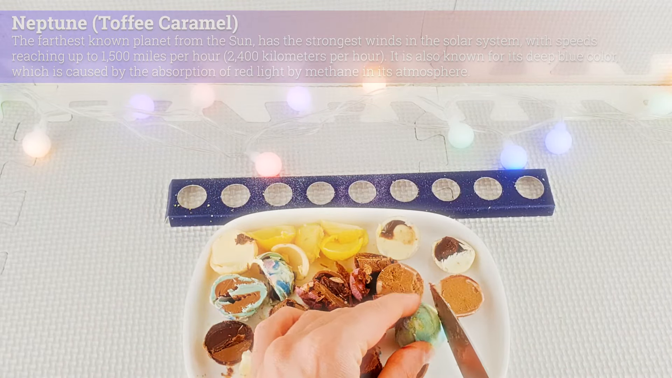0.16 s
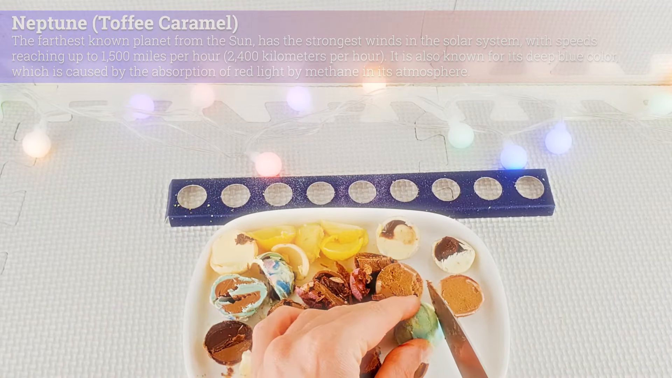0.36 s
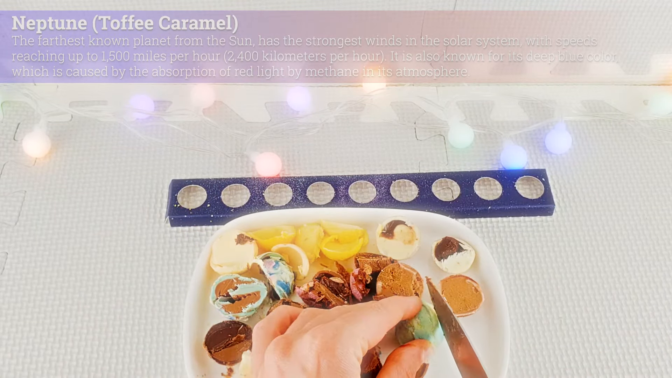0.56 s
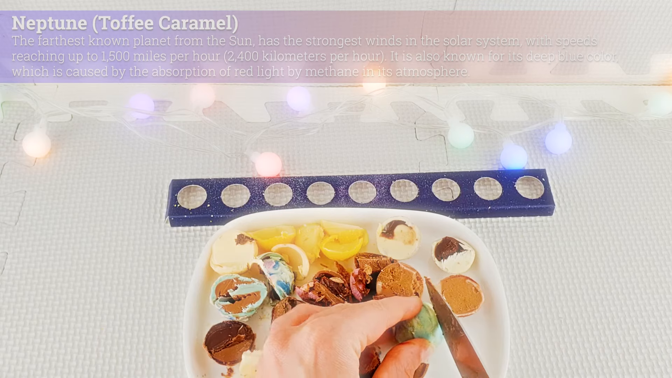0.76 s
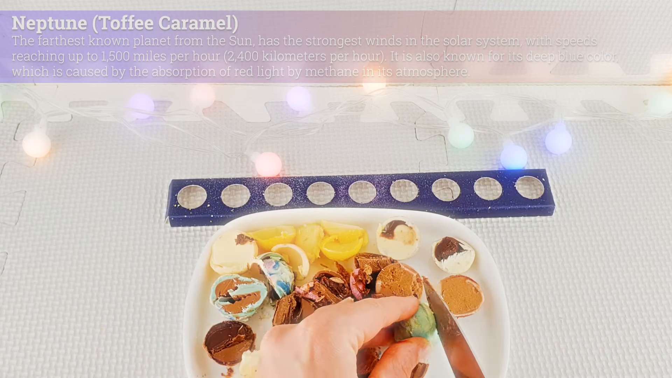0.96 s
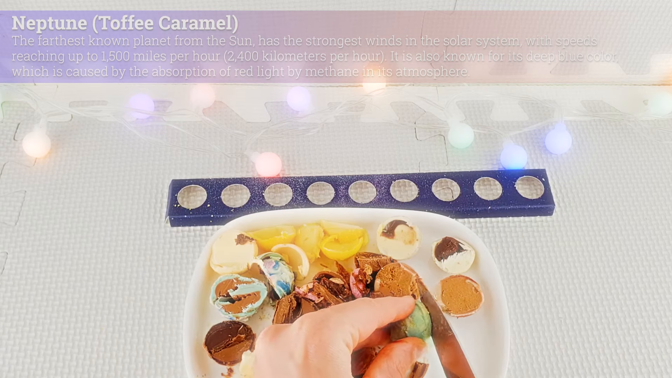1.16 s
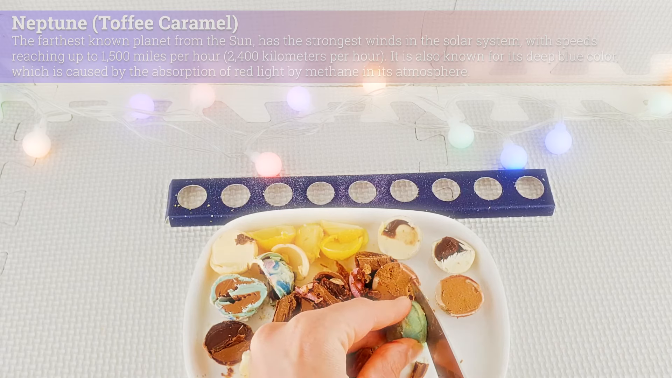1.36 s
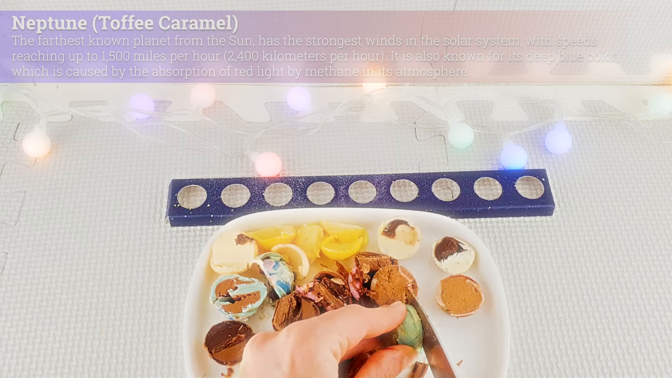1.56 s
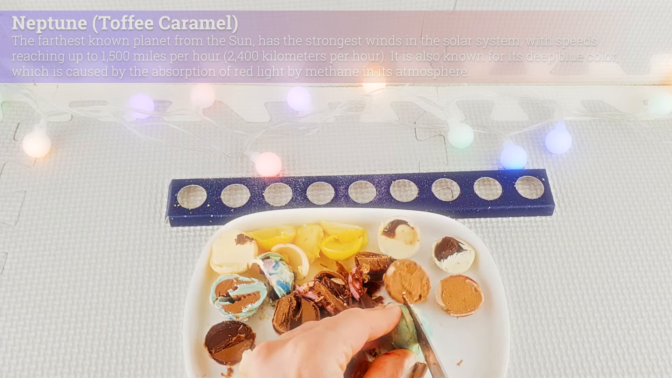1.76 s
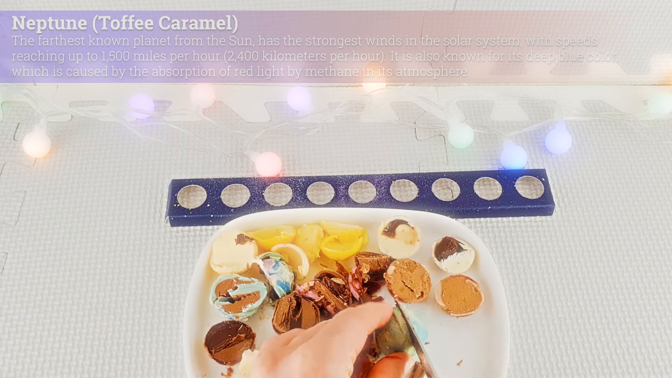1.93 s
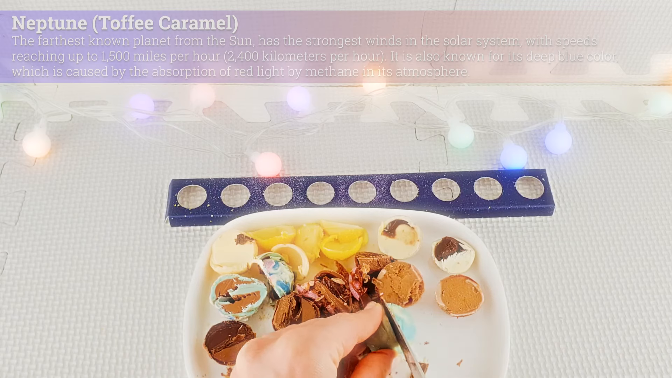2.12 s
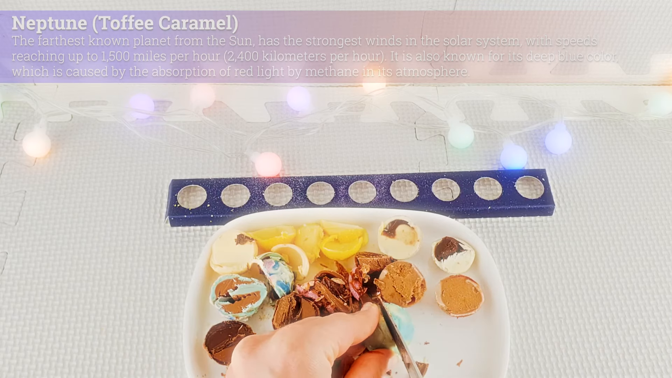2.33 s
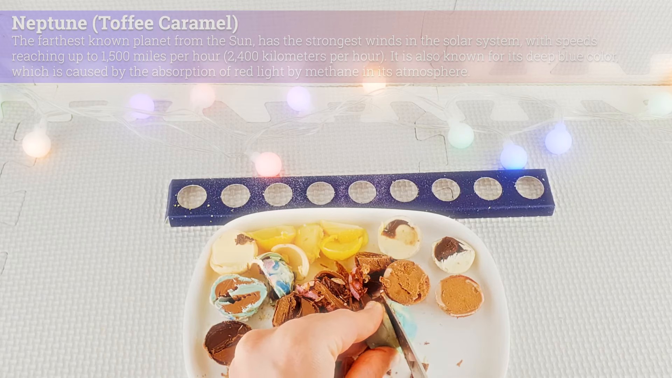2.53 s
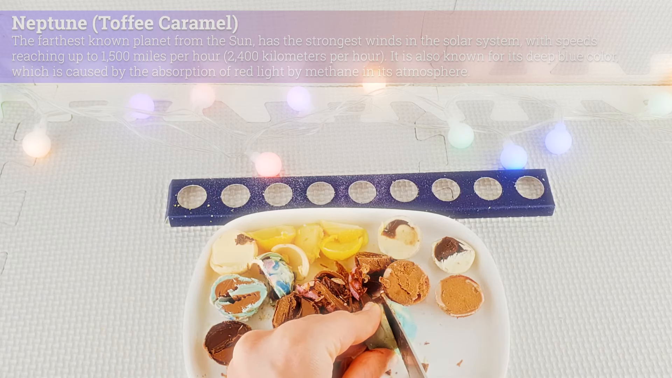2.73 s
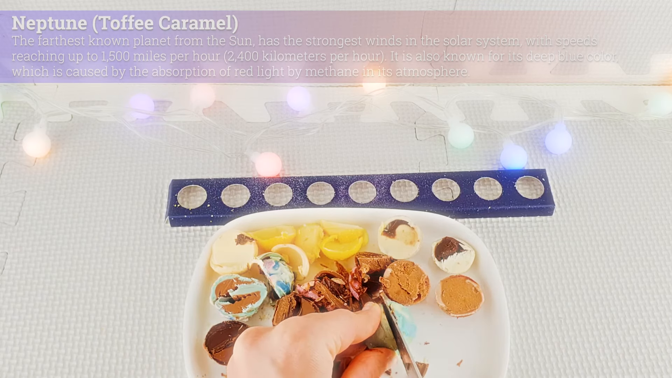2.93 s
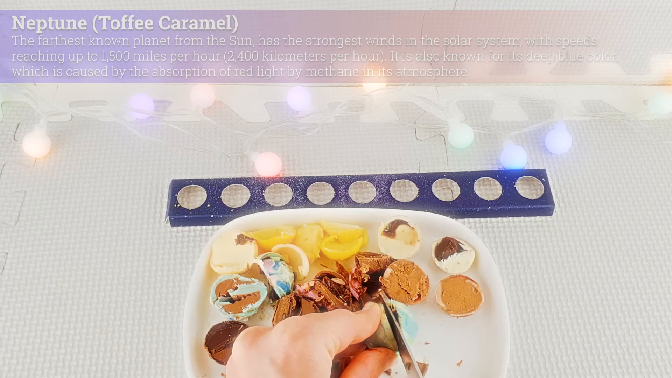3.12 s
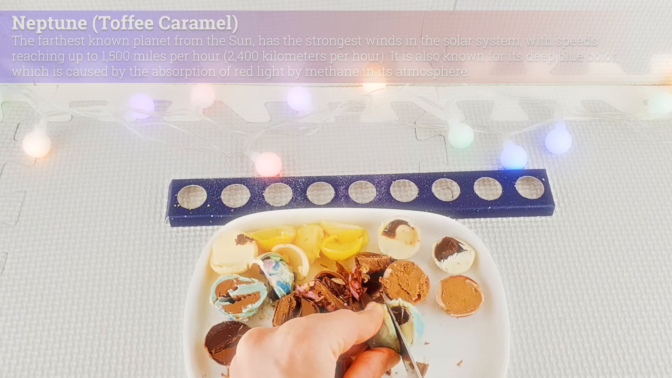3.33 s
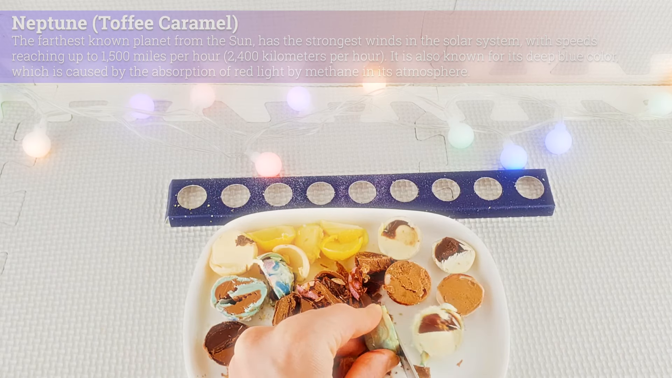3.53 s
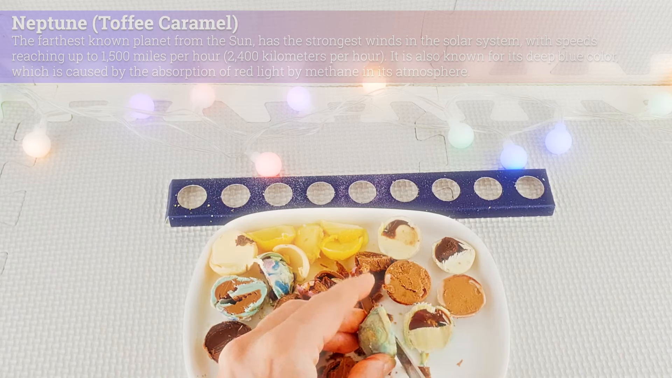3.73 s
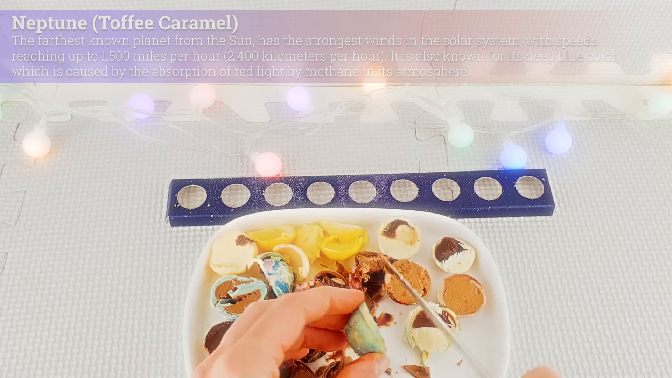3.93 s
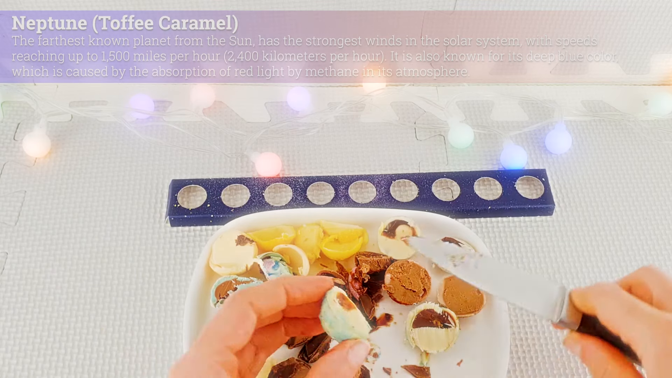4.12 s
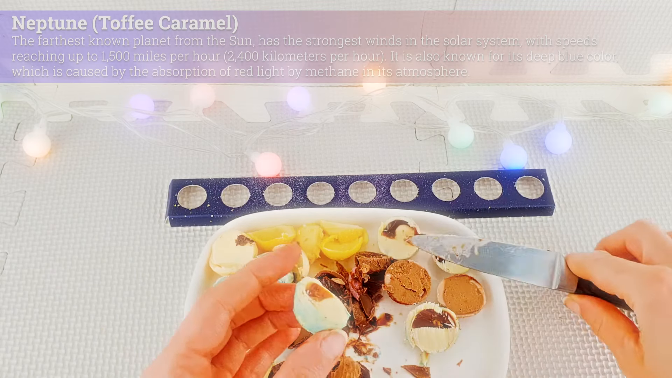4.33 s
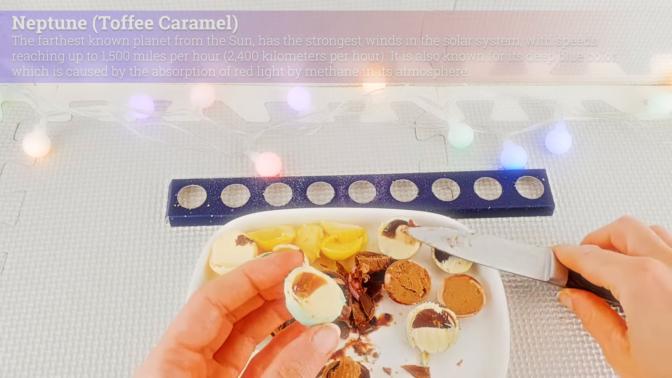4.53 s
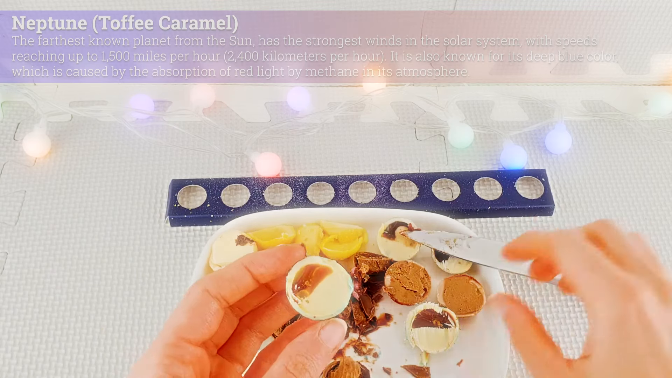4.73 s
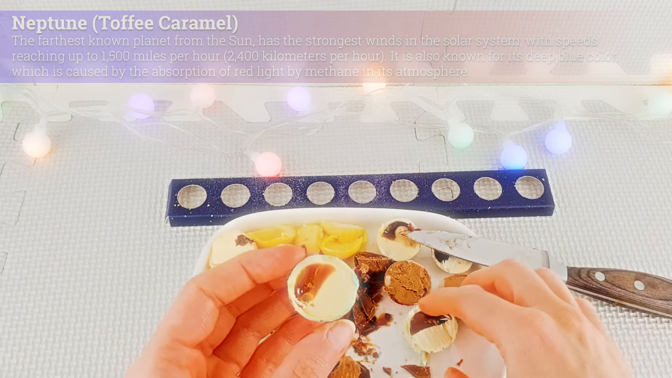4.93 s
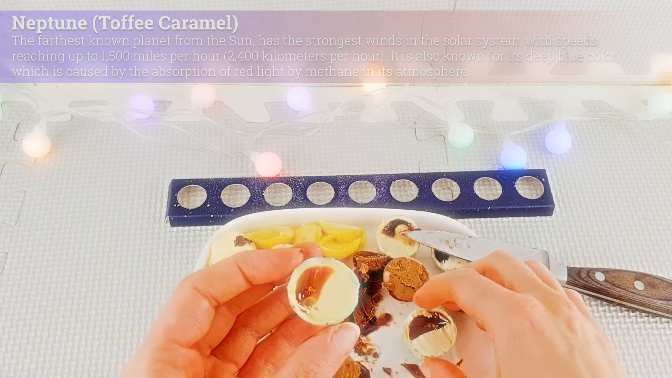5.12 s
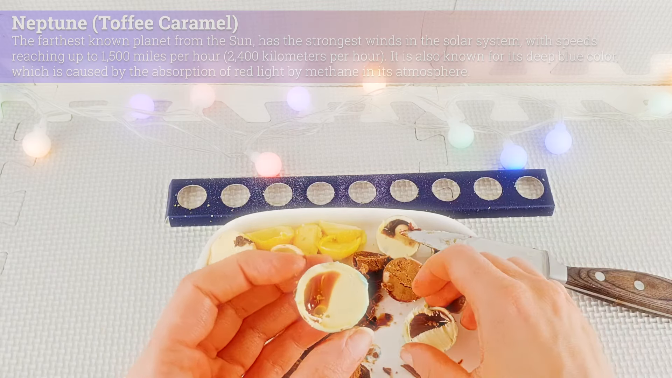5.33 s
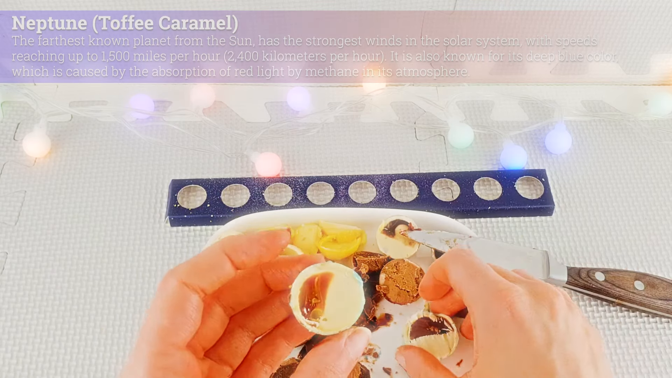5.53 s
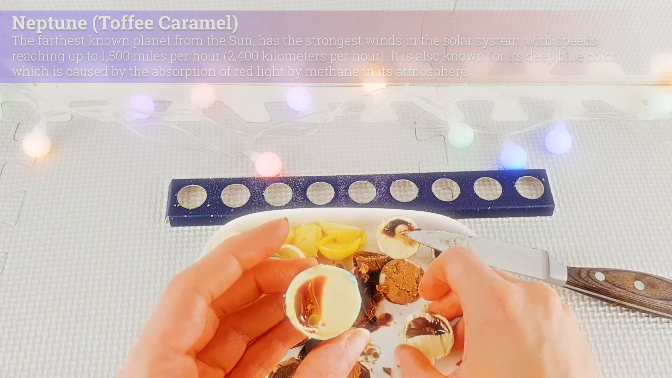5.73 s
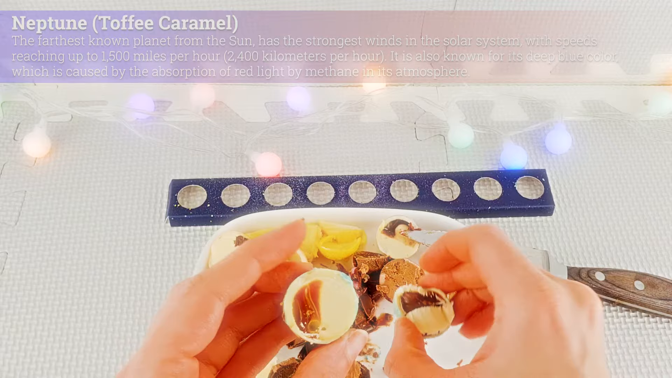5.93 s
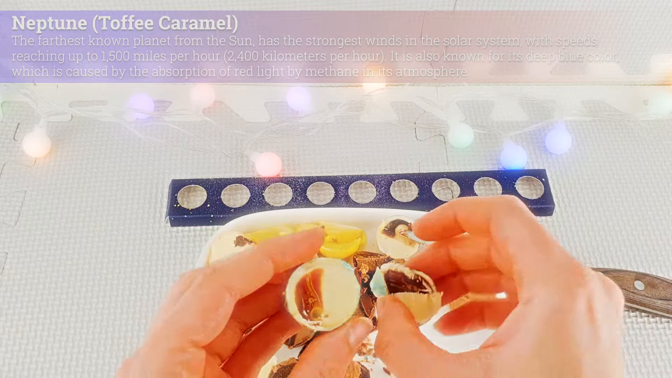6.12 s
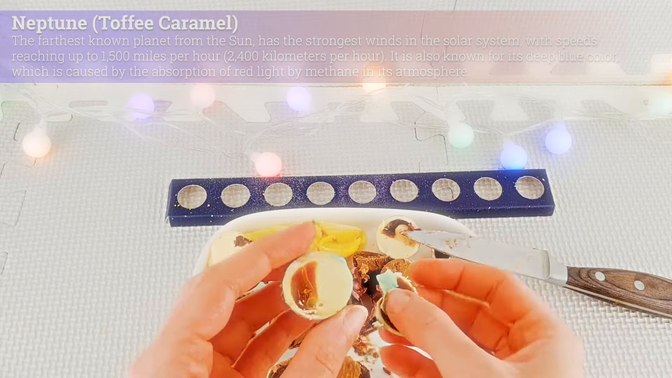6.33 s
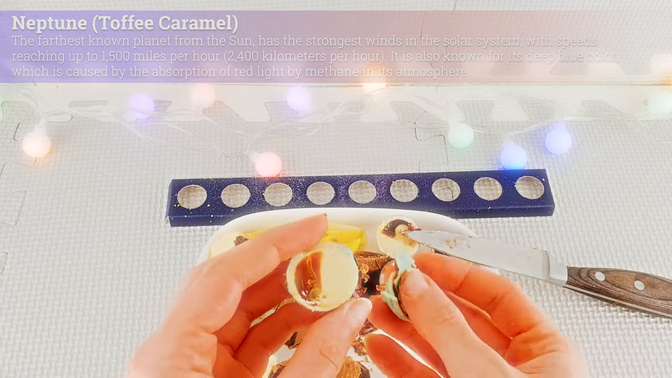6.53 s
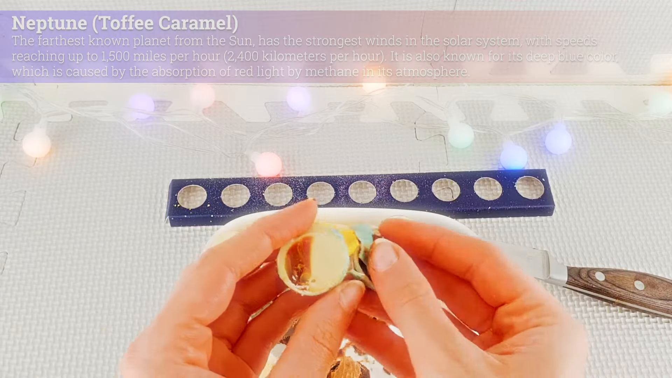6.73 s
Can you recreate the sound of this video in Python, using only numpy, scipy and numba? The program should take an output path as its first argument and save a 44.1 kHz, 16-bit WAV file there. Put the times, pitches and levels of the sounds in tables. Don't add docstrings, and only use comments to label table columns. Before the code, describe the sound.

Close, quiet cutting rumbles through a table, a sharp overloaded crack strikes a plate, then knife clicks, small taps and a brief crumb crunch follow.

```python
import sys
import numpy as np
from scipy import signal
from scipy.fft import rfft, irfft, next_fast_len
from scipy.io import wavfile
from scipy.ndimage import uniform_filter1d
from numba import njit

SR = 44100
rng = np.random.default_rng(int(sys.argv[2]) if len(sys.argv) > 2 else 0)


def invert_db(level):
    return 10 ** (np.asarray(level, dtype=float) / 20)


def persist_wave(psi):
    counts = np.round(np.clip(psi, -1, 1) * 32767).astype(np.int16)
    wavfile.write(sys.argv[1], SR, np.atleast_2d(counts).T)


N = 302922

# (frequency [Hz], density [dB per Hz])
HISS_COLOUR = [(150, -30), (260, 3), (427, -12), (499, -4), (1350, -9.5), (3710, -11.5), (7620, -24.5),
               (9360, -21), (10200, -27.5), (15600, -31)]
HISS_DB, CRACK_S = -84.5, 3.36
GATE_DB, GATE_SLOPE = -36.5, .75

# (time [s], level [dB])
WORK = [(0, -62), (0.351, -62), (0.9, -59), (1.37, -66.5), (1.65, -57.5), (2.1, -62), (2.44, -63),
        (2.798, -61), (3.2, -59), (3.78, -60), (4.04, -72.5), (4.84, -71.5), (5.0, -68), (5.5, -67.5),
        (5.75, -59), (6.0, -70), (6.34, -63), (6.87, -65.5)]
# (time [s], tremble [dB], rub [dB], spread [ms])
MOVES = [(0.049, -71.5, -74, 67), (.44, -57.5, -82, 50), (.962, -56.5, -101, 84), (1.144, -67, -101, 47),
         (1.25, -66, -84, 95), (1.466, -64, -89, 58), (1.719, -61, -75.5, 69), (1.82, -68, -86, 24),
         (1.91, -70, -80, 57), (2.01, -57.5, -77.5, 43), (2.214, -55, -99, 66), (2.501, -58, -76.5, 120),
         (2.686, -64, -86, 77), (2.769, -70, -80, 27), (2.95, -57, -76.5, 93.2), (3.097, -70, -101, 58),
         (3.28, -52.5, -101, 46), (4.075, -68, -108, 67), (4.168, -87.5, -100, 46), (4.278, -69, -106, 20),
         (4.95, -62.5, -100.5, 61), (5.14, -72, -96, 71), (5.25, -64, -99, 66), (5.385, -69, -93, 45),
         (5.61, -59.5, -83.5, 62), (5.79, -61, -84, 43), (5.87, -57, -95, 66), (6.12, -64, -87, 69.3),
         (6.36, -67.5, -93, 74)]
# (frequency [Hz], t60 [s], share [1])
TABLE_HELD = [(45, .08, 0.037), (73, .04, .01), (96, 0.044, 0.042), (105, 0.08, .016), (120.44, .035, .4),
              (152, 0.041, 0.37), (192, 0.035, 0.19)]
EVEN_SHARE, EVEN_SAMPLES = .6, 1300
SLEEVE_FLOOR_DB = -90.5

# (time [s], grind [dB], rustle [dB], rise [ms], fall [ms])
STROKES = [(.726, -105, -79.5, 4.5, 62), (1.244, -87, -84.5, 150, 67), (1.611, -76, -77, 50, 82),
           (2.484, -68, -99, 76, 25), (2.95, -71.5, -100, 40, 55), (2.995, -53.5, -92.5, 50, 17),
           (3.025, -60, -88.5, 8.6, 12), (3.31, -54.5, -85.5, 86, 94), (3.344, -60, -77, 50, 10),
           (3.734, -100, -69, 7.9, 14.5), (4.008, -105, -89, 52.5, 77), (5.388, -87, -106, 164, 273)]
# (frequency [Hz], width [Hz], level [dB])
EDGE = [(2080, 38, -24), (4230, 67, 1), (4300, 34, -1), (4280, 24, -6), (5350, 42, -12.5),
        (6965, 47, -23.5)]
EDGE_UNDER_DB = -42

# (frequency [Hz], t60 [s], signed share [1])
TABLE = [(75.7, .38, .007), (90.8, .23, -.044), (94.5, .38, -.068), (103.8, .5, .026), (119.7, .18, .345),
         (146.3, .15, .52), (149.6, .13, -.704), (178.0, .28, -.122), (224.3, .28, -.017),
         (295.7, .25, -.045), (420, .066, -.008)]
# (time [s], force [dB], contact [ms], way [+1 down, -1 release])
PUSHES = [(.0906, -9.2, 1.89, -1), (.1009, -16.5, 2.07, -1), (.1096, -26.8, 4.37, 1),
          (.1315, -19.8, 2.31, -1), (.5171, -4.1, 2.1, -1), (.5378, -21.8, 2.45, 1),
          (3.3029, -9.7, 2.34, 1), (3.3204, -14.7, 2.09, 1), (3.349, -6.6, .8, -1), (3.3613, 7.6, 4.03, -1),
          (3.369, 6.5, 2.4, -1), (3.3853, -14.5, .8, 1), (3.402, 7.2, 2.48, -1), (3.4281, -4.6, 3.16, 1),
          (3.4706, -8.4, 2.43, 1), (4.3953, -18.5, .8, -1), (4.4011, -6.8, 3.77, 1), (4.4189, -6.1, 2.0, 1),
          (4.4337, -13, 3.84, 1), (4.5465, -25.2, 1.86, 1), (4.5906, -9.8, 1.59, -1),
          (4.6036, -23.3, 4.1, -1)]
# (time [s], force [dB], contact [ms], way [+1 down, -1 release])
NUDGES = [(.4132, -30, 2, -1), (.4495, -31, 3.6, -1), (1.6726, -28.5, 3.6, 1), (1.6985, -29, 1.2, -1),
          (1.7461, -29.5, 2, -1), (1.7715, -23.5, 1.2, 1), (1.7928, -19.5, 2, -1), (1.8177, -28.5, 1.2, -1),
          (1.8363, -28.5, 2, 1), (1.9266, -23, 3.6, 1), (1.9388, -30, 3.6, 1), (1.971, -27, 1.2, -1),
          (1.9828, -28.5, 3.6, -1), (2.6585, -28, 2.8, 1), (2.6849, -30.5, 3.6, 1), (2.7479, -28, 3.6, -1),
          (2.976, -29.5, 2, 1), (2.9901, -20.5, 2, -1), (3.0109, -23, 2, 1), (3.0359, -24.5, 2.8, 1),
          (4.9098, -31, 3.6, 1), (4.9411, -34, 3.6, 1), (5.0368, -27.5, 2.8, -1), (5.6023, -32, 2, -1),
          (5.7434, -30.5, 3.6, 1), (5.7842, -25.5, 2, -1), (5.8073, -26.5, 2.8, -1), (5.8472, -28.5, 2, 1)]

# (time [s], peak [dB], chatter [ms], left lag [ms], left minus right [dB])
SHELL_HITS = [
    (.0905, -55.5, 2.2, 0.043, 1.7),
]
# (frequency [Hz], width [Hz], level [dB])
SHELL = [(1134, 120, -1.5), (2470, 260, -5.5), (2600, 300, -4.5)]
# (time [s], peak [dB], chatter [ms], left lag [ms], left minus right [dB])
THUD_HITS = [
    (.0915, -51, 3.4, 0.018, -0.24),
    (.5165, -71, 8.3, 0.029, 0.29),
    (.545, -56.5, 8.7, 0.039, 0.19),
    (.572, -62.5, 12, .03, .4),
    (4.397, -47, 5.1, .03, -1.9),
    (5.787, -65, 1.7, 0.032, .5),
    (5.905, -60.5, 0.82, 0.027, 0.71),
]
# (frequency [Hz], level [dB])
THUD_SNAP = [(150, -28.5), (260, -1), (289, 3.5), (359, -17.5), (477, -7.5), (676, -25.5), (927, -14.5),
             (1800, -44.5), (2340, -69), (3960, -120)]
# (time [s], peak [dB], chatter [ms], left lag [ms], left minus right [dB])
TICK_HITS = [
    (.7235, -55, 5.2, 0.021, -14),
    (.737, -60, 11, 0.022, -8),
    (.790, -61, 4.4, .02, -3),
]
# (frequency [Hz], width [Hz], level [dB])
TICK = [(1150, 300, -6), (5260, 620, -4), (6600, 690, -15)]
# (time [s], peak [dB], chatter [ms], left lag [ms], left minus right [dB])
PLATE_HITS = [
    (3.3089, -52, 3.8, 0.044, 0),
    (3.3580, 10, 1.4, 0.081, 5.5),
    (3.3936, -7.5, 9.7, .05, 1.5),
    (3.4405, -17, 8.8, .05, 0),
    (3.4739, -24.5, 8.8, 0.048, .5),
]
# (frequency [Hz], width [Hz], level [dB])
PLATE = [(1240, 71, -31), (2045, 150, -17.5), (2900, 54, -21.5), (4161, 94, 3.5), (4435, 30, -14),
         (4680, 31, -16), (4840, 30, -8), (5006, 37, -11), (5510, 26, -15.5), (5672, 30, -34),
         (7490, 35, -21.5), (7793, 35, -11.5), (7900, 100, -31.5), (9070, 91, -28.5), (9562, 29, -43),
         (10800, 200, -27), (12080, 170, -28.5), (16000, 310, -35),
         (583, 60, -25.5), (5370, 150, -20.5), (7260, 1200, -29), (3330, 340, -26.5), (298, 60, -30),
             (910, 60, -30)]
# (frequency [Hz], level [dB])
PLATE_SNAP = [(160, -37.5), (280, -12.5), (441, -22), (865, -29), (1190, -21), (1700, -22.5), (2110, -21.5),
              (3810, -33), (4170, -12), (4600, -25.5), (6100, -47.5), (7720, -31.5), (15600, -45)]
# (frequency [Hz], t60 [s], level [dB])
ROCKING = [(47.3, .7, -29), (70, 0.28, -24), (151, .45, -30.5), (177, 0.3, -19.5), (211, 0.42, -29.5),
           (4058, .3, -26.5), (4214, 0.37, -19.5), (4080, .4, -28), (4600, .3, -33)]
# (time [s], rocking [dB], rim [dB])
ROCKING_BLOWS = [
    (3.3585, 0.76, -0.18),
    (4.4165, -22.5, -27.5),
    (4.593, -42, -25.5),
]
# (time [s], peak [dB], chatter [ms], left lag [ms], left minus right [dB])
HANDLE_HITS = [
    (3.733, -68, 4.1, 0.014, -3),
    (4.4159, -19, 3.4, -0.024, -3.5),
    (4.4205, -21, 4, -.02, -3),
    (4.430, -26.5, 2.7, -.02, -2),
]
# (frequency [Hz], width [Hz], level [dB])
HANDLE = [(988, 28, -4.5), (1060, 29, -7), (2155, 31, -6.5), (2826, 28, -6.5), (3626, 120, -11),
          (4174, 31, 0), (4860, 29, -6), (6520, 30, 1.5), (7220, 28, -7.5), (7690, 30, -12.5),
          (8560, 25, -4.5), (9267, 26, -13), (10020, 41, -16), (12390, 28, -11)]
# (frequency [Hz], level [dB])
HANDLE_SNAP = [(160, -39), (280, -9), (373, -24), (910, -4), (2400, -14.5), (3500, -3), (4140, -3),
               (4580, -15), (6520, -15.5), (12400, -23.5), (13000, -46), (14000, -45.5), (15600, -31.5)]
# (time [s], peak [dB], chatter [ms], left lag [ms], left minus right [dB])
GRAZE_HITS = [
    (4.3955, -43, 8.7, .02, -1.5),
    (4.403, -52, 6.5, .02, -2),
    (4.5903, -38, 1.5, .02, .5),
]
# (frequency [Hz], level [dB])
GRAZE_SNAP = [(400, -36), (900, -10), (1600, 3.5), (3000, -6), (4000, -15.5), (8000, -35.5)]
# (time [s], peak [dB], chatter [ms], left lag [ms], left minus right [dB])
BLADE_HITS = [
    (4.5905, -43, 1.0, 0.0072, 0.68),
    (4.5921, -15, 2.7, -0.079, 1.2),
    (4.5957, -13, 3.5, -0.045, 1.3),
    (4.6045, -22.5, 5.8, -0.041, .6),
    (4.611, -24, 0.94, -0.072, .6),
    (4.6666, -44, 3.4, 0.071, 0.281),
]
# (frequency [Hz], width [Hz], level [dB])
BLADE = [(858.4, 67, -15.5), (1137, 120, -20.5), (2280, 36, -21), (3640, 33, -12.5), (4030, 22, -3.5),
         (4230, 44, 3.5), (4955, 33, -11), (6400, 84, -18.5), (7200, 34, -7), (8527, 96, -5),
         (8970, 38, -9), (9750, 32, -18.5), (11866, 140, -24.5), (13760, 100, -31)]
# (frequency [Hz], level [dB])
BLADE_SNAP = [(160, -31.5), (280, -15.5), (500, -28), (760, -37), (900, -13.5), (1400, -23), (3010, -20),
              (4200, -9), (5420, -26), (8830, -12.5), (15600, -43.5)]
# (time [s], peak [dB], chatter [ms], left lag [ms], left minus right [dB])
TAP_HITS = [
    (5.788, -51.5, 28, 0.044, 0.47),
    (5.822, -54, 8.2, 0.037, .5),
    (5.848, -56.5, 5.6, 0.053, .5),
]
# (frequency [Hz], width [Hz], level [dB])
TAP = [(2170, 34, 2), (4100, 150, 14.5), (4940, 34, 11), (5170, 110, 14.5), (7140, 42, 2)]
# (time [s], peak [dB], chatter [ms], left lag [ms], left minus right [dB])
CRUMB_HITS = [
    (6.2408, -38.5, 11, 0.028, -8.5),
    (6.25, -47.5, 21, 0.025, -4),
    (6.262, -52, 24.7, 0.041, -4.5),
]
# (frequency [Hz], level [dB])
CRUMB_SNAP = [(350, -55), (600, -20), (1720, -4.5), (2300, -2.5), (2630, -8.5), (3650, 4), (5640, -4),
              (11300, -9), (14000, -64)]

# (frequency [Hz], t60 [s])
ROOM_T60 = [(300, 0.3), (1000, 0.35), (4000, 0.37), (8000, 0.3), (14000, 0.24)]
# (frequency [Hz], level [dB])
ROOM_COLOUR = [(200, 4.5), (400, 1.5), (600, 5), (900, 2), (1500, 2), (3000, 0.5), (4500, 1), (8000, 0),
               (12000, -5.5)]
# (frequency [Hz], level [dB])
CORNER_COLOUR = [(250, -4), (500, 12), (900, -2.5), (1600, 3.5), (3000, 0), (4500, -3), (8000, -0.5),
                 (12000, 0.5)]
ECHOES = rng.standard_normal((2, SR // 2))


def on_log_hz(points, hz):
    at, value = np.transpose(points)
    return np.interp(np.log(np.maximum(hz, 1)), np.log(at), value)


def colour(x, points):
    length = x.shape[-1]
    size = next_fast_len(length, True)
    hz = np.arange(size // 2 + 1) * SR / size
    return irfft(rfft(x, size) * invert_db(on_log_hz(points, hz)), size)[..., :length]


def causal(points, size):
    hz = np.arange(size // 2 + 1) * SR / size
    cepstrum = irfft(np.log(invert_db(on_log_hz(points, hz))), size)
    cepstrum[1:size // 2] *= 2
    cepstrum[size // 2 + 1:] = 0
    return np.exp(rfft(cepstrum))


def ring(x, hz, t60):
    r = np.exp(-np.log(1000) / (t60 * SR))
    w = 2 * np.pi * hz / SR
    return signal.lfilter([0, r * np.sin(w)], [1, -2 * r * np.cos(w), r * r], x)


def resonate(x, peaks, least_hz):
    out = 0 * x
    for k, (hz, width, db) in enumerate(peaks):
        width = max(width, least_hz)
        t60 = np.log(1000) / np.pi / width
        gain = invert_db(db) * 2 * np.pi * width / SR
        out = out + (-1) ** k * gain * ring(x, hz, t60)
    return out


def unit(x):
    return x / np.sqrt(np.mean(x ** 2))


def spread(db):
    return invert_db(np.array([[db / 2], [-db / 2]]))


def flicker(rate, depth_db):
    k = int(SR / rate)
    steps = np.repeat(rng.standard_normal(N // k + 1), k)
    return invert_db(depth_db * uniform_filter1d(steps, k)[:N])


def swells(s, db, rise_ms, fall_ms):
    t, gain = np.arange(0, N, 32) / SR, 0
    for at, top, rise, fall in zip(s, db, rise_ms, fall_ms):
        distance = np.where(t < at, (at - t) / rise, (t - at) / fall)
        gain = gain + invert_db(top - 2e4 * distance)
    return np.repeat(gain, 32)[:N]


def hiss():
    after_s = np.arange(N) / SR - CRACK_S
    duck_db = -5.5 * (after_s > 0) * np.exp(-np.maximum(after_s, 0) / 2.2)
    return unit(colour(rng.standard_normal((2, N)), HISS_COLOUR)) * invert_db(HISS_DB + duck_db)


def busy_db():
    return np.interp(np.arange(N) / SR, *np.transpose(WORK))


def trembling():
    s, db, _, ms = np.transpose(MOVES)
    return np.hypot(invert_db(busy_db()), swells(s, db, 1.8 * ms, 2.0 * ms))


def before_gate():
    return (trembling() / invert_db(GATE_DB)) ** (-GATE_SLOPE / (1 + GATE_SLOPE))


def tremble():
    first, second = rng.standard_normal((2, N))
    shake = np.array([first + 0.52 * second, first - 0.13 * second])
    shake = colour(shake, [(20, -6.5), (45, 0.0), (80, 6.0), (170, -2.5), (230, -17.0), (400, -48.5)])
    wood = sum(share * ring(shake, hz, t60) for hz, t60, share in TABLE_HELD)
    swing = np.mean(wood ** 2, axis=0)
    swing = uniform_filter1d(uniform_filter1d(swing, EVEN_SAMPLES), EVEN_SAMPLES)
    return unit(wood / swing ** (EVEN_SHARE / 2)) * trembling() * before_gate()


def sleeves():
    s, _, db, ms = np.transpose(MOVES)
    rubbing = np.hypot(invert_db(SLEEVE_FLOOR_DB), swells(s, db, 2.6 * ms, 0.62 * ms))
    cloth = rng.standard_normal((2, N))
    cloth = colour(cloth, [(200, -29.0), (350, 2.5), (900, -5.5), (1300, -14.0), (4000, -37)])
    return unit(cloth) * rubbing * flicker(rate=8, depth_db=3.5) * invert_db(-2.0)


def grinding():
    s, grind_db, rustle_db, rise_ms, fall_ms = np.transpose(STROKES)
    rest = invert_db(busy_db() + EDGE_UNDER_DB)
    slips = rng.standard_normal(N) * invert_db(rng.exponential(size=N))
    grind = unit(resonate(slips, EDGE, least_hz=130.55))
    grind = grind * (swells(s, grind_db, rise_ms, fall_ms) + rest) * invert_db(-9.0)
    crumbs = rng.standard_normal(N)
    crumbs = colour(crumbs, [(2000, -18.5), (4500, -1.5), (6500, -0.5), (9000, -10.5), (14000, -20.5)])
    rustle = unit(crumbs) * (swells(s, rustle_db, 2.0 * rise_ms, fall_ms) + invert_db(-7.5) * rest)
    return spread(-5) * grind + rustle


def thumps():
    t, force = np.arange(N) / SR, np.zeros(N)
    for s, db, ms, way in PUSHES + NUDGES:
        near = slice(int((s - .03) * SR), int((s + .03) * SR))
        bell = np.exp(-.5 * ((t[near] - s) / (ms / 1000)) ** 2)
        level = invert_db(db) * np.exp(2 * (np.pi * 110 * ms / 1000) ** 2)
        force[near] += np.sign(way) * level * bell / bell.sum()
    return sum(share * ring(force, hz, t60) for hz, t60, share in TABLE)


def strikes(hits, peaks, snap, least_hz=150, snap_db=0, first=4.7):
    size, lead = 8192, 32
    t, hz = np.arange(size) / SR, np.arange(size // 2 + 1) * SR / size
    out = np.zeros((2, N + size))
    side = np.array([[.5], [-.5]])
    for s, db, ms, lag_ms, pan_db in hits:
        touch = rng.standard_normal(size) * np.exp(-t / (ms / 1000))
        touch[0] = first
        touch = irfft(np.exp(1j * np.angle(rfft(touch))), size) * np.exp(-t / (ms / 300))
        broad = irfft(rfft(touch) * causal(snap, size), size)
        sound = resonate(touch, peaks, least_hz) + invert_db(snap_db) * broad
        sound /= np.abs(sound).max()
        delay = np.exp(-2j * np.pi * hz * (lead / SR + side * lag_ms / 1000))
        start = int(s * SR) - lead
        out[:, start:start + size] += invert_db(db + side * pan_db) * irfft(rfft(sound) * delay, size)
    return out[:, :N]


def shell_knock():
    return strikes(SHELL_HITS, SHELL, THUD_SNAP, snap_db=-25.0)


def dull_thuds():
    return strikes(THUD_HITS, [], THUD_SNAP, first=1.4)


def crumb_ticks():
    return strikes(TICK_HITS, TICK, CRUMB_SNAP, snap_db=-12.5)


def plate_crack():
    return strikes(PLATE_HITS, PLATE, PLATE_SNAP, least_hz=74.28, snap_db=-1, first=3.6)


def rocking():
    low, rim = np.zeros(N), np.zeros(N)
    for s, low_db, rim_db in ROCKING_BLOWS:
        low[int(s * SR)] = invert_db(low_db)
        rim[int(s * SR)] = invert_db(rim_db)
    low = uniform_filter1d(uniform_filter1d(low, size=60), size=60)
    return sum(invert_db(db) * ring(low if hz < 1000 else rim, hz, t60) for hz, t60, db in ROCKING)


def handle_click():
    return strikes(HANDLE_HITS, HANDLE, HANDLE_SNAP, least_hz=110, snap_db=-5.5)


def rim_graze():
    return strikes(GRAZE_HITS, [], GRAZE_SNAP, first=1.6)


def blade_click():
    return strikes(BLADE_HITS, BLADE, BLADE_SNAP, least_hz=60.07, snap_db=-4, first=2.6)


def light_taps():
    return strikes(TAP_HITS, TAP, CRUMB_SNAP, least_hz=246, snap_db=-1.5)


def crumb_crunch():
    return strikes(CRUMB_HITS, [], CRUMB_SNAP)


def room(x, wet_db, returns, shorter, gap_ms=4):
    t = np.arange(SR // 2) / SR
    tail = 0
    for hz in 250 * 2. ** np.arange(0, 6.5, .5):
        band = colour(ECHOES, [(hz / 2, -60), (hz / 1.19, -3), (hz, 0), (hz * 1.19, -3), (hz * 2, -60)])
        band = band[0] + min(hz / 850, 1) ** 2 * band[1] * np.array([[1], [-1]])
        decay = np.exp(-np.log(1000) * t / (shorter * on_log_hz(ROOM_T60, hz)))
        tail = tail + invert_db(on_log_hz(returns, hz)) * band * decay
    tail = tail * np.clip(t / (gap_ms / 1000), 0, 1) ** 2
    tail *= invert_db(wet_db) / np.sqrt(np.sum(tail ** 2, axis=1, keepdims=True))
    return x + signal.fftconvolve(x.mean(axis=0, keepdims=True), tail, axes=1)[:, :N]


def scene():
    wood = spread(-.6) * (thumps() + tremble()) + spread(-.8) * rocking()
    lift = before_gate()
    cut = grinding() * lift + plate_crack() + dull_thuds() + shell_knock()
    aside = handle_click() + blade_click() + rim_graze()
    aside = aside + crumb_crunch() + light_taps() + crumb_ticks()
    around = room(cut, -1.6, ROOM_COLOUR, 0.99) + room(aside, -7.0, CORNER_COLOUR, 1.0)
    return wood + around + sleeves() * lift


@njit
def follow(x, attack, release):
    out, e = np.empty(len(x)), x[0]
    for i in range(len(x)):
        e += (x[i] - e) * (attack if x[i] > e else release)
        out[i] = e
    return out


def low_pass(x):
    return signal.sosfilt(signal.butter(12, 15800, fs=SR, output="sos"), x)


def record(dry):
    heard = signal.sosfilt(signal.butter(4, 44, "high", fs=SR, output="sos"), dry)
    power = np.mean(heard ** 2, axis=0) + invert_db(-110)
    power = follow(power, 1 / (0.007 * SR), 1 / (0.017 * SR))
    power = uniform_filter1d(power, size=200)
    over_gate = invert_db(-5.5) * np.sqrt(power) / invert_db(GATE_DB)
    heard = heard * np.minimum(over_gate, 1) ** GATE_SLOPE
    return low_pass(np.clip(heard + hiss(), -1, 1))


dry = scene()
out = record(dry)
persist_wave(out)
```